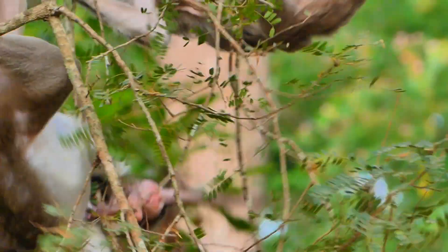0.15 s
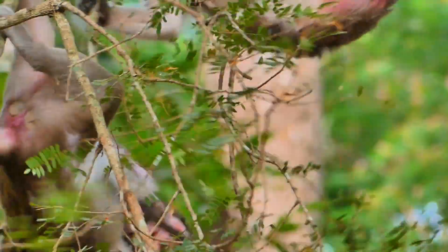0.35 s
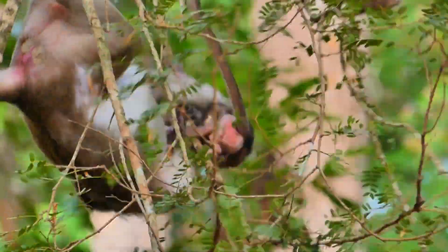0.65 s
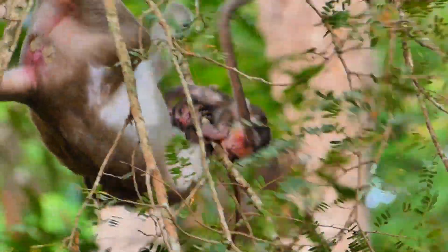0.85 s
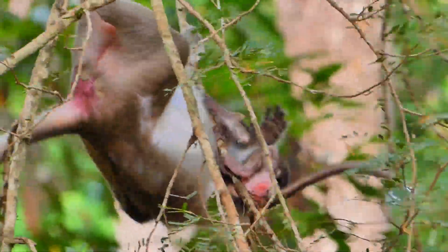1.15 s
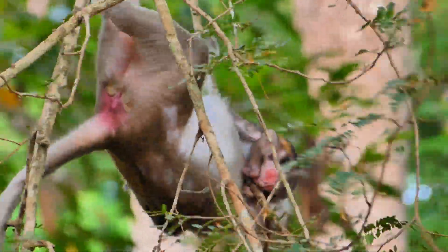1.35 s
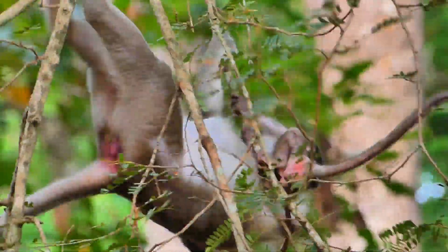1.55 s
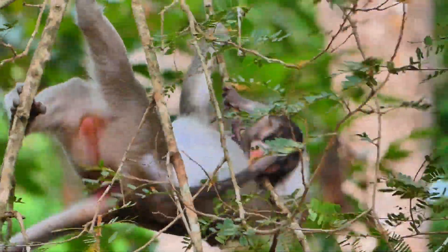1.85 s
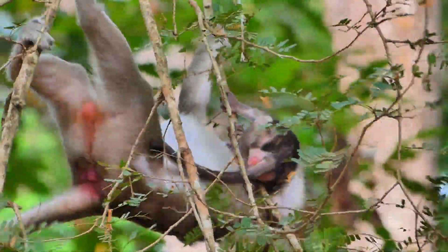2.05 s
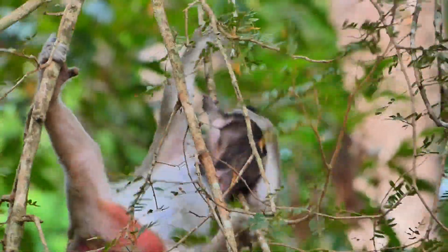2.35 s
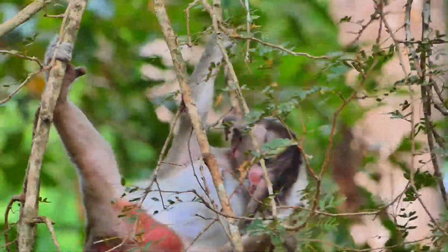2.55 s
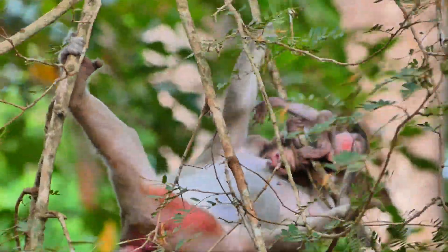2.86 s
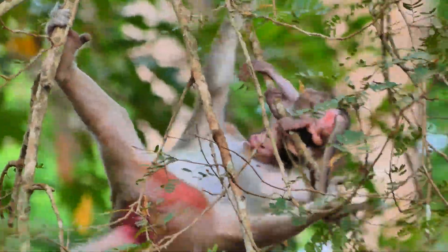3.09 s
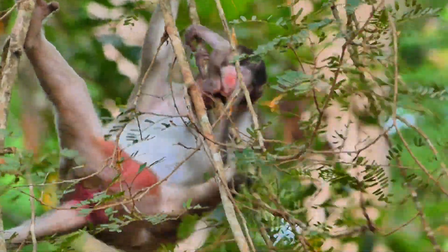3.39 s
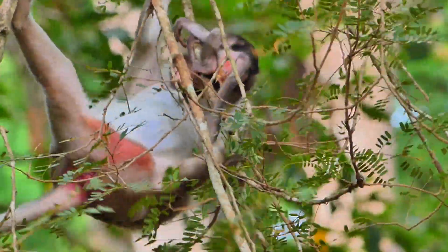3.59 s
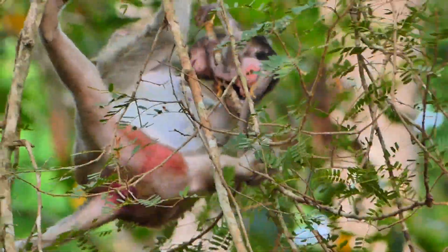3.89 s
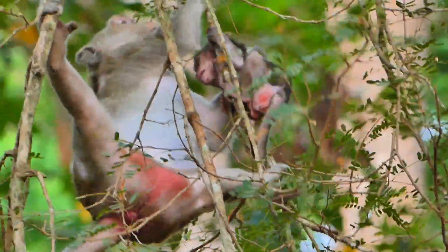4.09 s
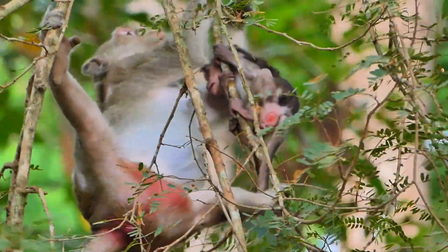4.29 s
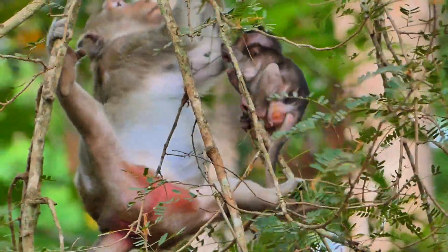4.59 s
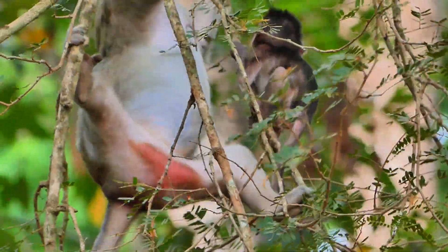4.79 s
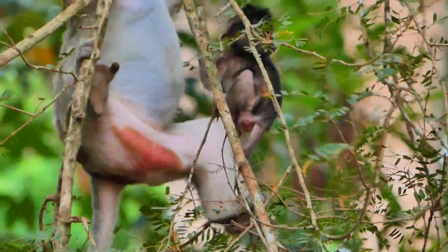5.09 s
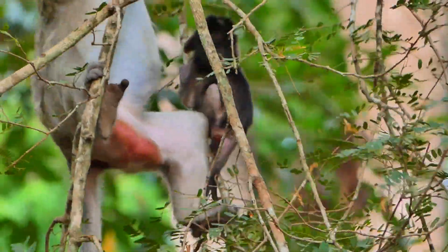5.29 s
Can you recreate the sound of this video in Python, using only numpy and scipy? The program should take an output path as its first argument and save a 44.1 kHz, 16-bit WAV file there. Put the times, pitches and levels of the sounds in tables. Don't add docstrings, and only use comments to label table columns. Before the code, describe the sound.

Close outdoor foliage sounds as monkeys climb a small tree. Leaves thrash at once while a young monkey gives a brief hissy rasp ending in a tiny squeak. Limbs scrape, twigs knock and snap in dense bursts for two seconds. A near-quiet lull follows over soft forest hush and faint birds, then one short high call and lighter rustling to the end. Nearly centred, narrow stereo, little echo.

```python
import sys
import numpy as np
from scipy import signal
from scipy.fft import rfft, irfft, next_fast_len
from scipy.io import wavfile
from scipy.ndimage import uniform_filter1d

SR = 44100
rng = np.random.default_rng(int(sys.argv[2]) if len(sys.argv) > 2 else 0)


def natural_amplitude(level_db):
    exponent = np.asarray(level_db, float) / 20
    return 10 ** exponent


def pcm_store(signal):
    levels = np.round(np.clip(np.atleast_2d(signal), -1, 1) * 32767)
    wavfile.write(sys.argv[1], SR, levels.astype(np.int16).T)


N = 239934
TIME = np.arange(N) / SR


def unit(x):
    return x / np.sqrt(np.mean(x ** 2) + 1e-20)


def along(points, hz):
    f, v = np.transpose(points)
    return np.interp(np.log(hz + 1), np.log(f + 1), v)


def curves(rows, outside=None):
    s, *cols = np.transpose(rows)
    return [np.interp(TIME, s, c, outside, outside) for c in cols]


def filtered(x, response):
    m = next_fast_len(N + 8192)
    return irfft(rfft(x, m) * response(np.fft.rfftfreq(m, 1 / SR)), m)[..., :N]


def coloured(x, spectrum):
    return filtered(x, lambda hz: natural_amplitude(along(spectrum, hz)))


def slow_noise(samples):
    return unit(uniform_filter1d(rng.standard_normal(N), size=samples))


def contacts(rate, spread_db, life):
    strength = natural_amplitude(spread_db * np.minimum(rng.exponential(1, N), 3.5))
    hits = (rng.random(N) < rate / SR) * strength
    return unit(signal.lfilter([1], [1, -np.exp(-1 / (life * SR))], hits))


def rush(spectrum, envelope=1, patchy_db=0):
    pair = envelope * rng.standard_normal((2, N))
    if patchy_db:
        z = signal.stft(pair, nperseg=512)[2]
        field = uniform_filter1d(rng.standard_normal(z.shape[1:]), size=4, axis=0)
        field = uniform_filter1d(field, size=6, axis=1)
        pair = signal.istft(z * natural_amplitude(patchy_db * unit(field)), nperseg=512)[1][:, :N]
    pair = coloured(pair, spectrum)
    return pair / np.std(pair[0])


def voice(pitch, multiples, levels_db, jitter):
    phase = 2 * np.pi * np.cumsum(pitch * (1 + jitter * slow_noise(200))) / SR
    return sum(np.sqrt(2) * natural_amplitude(db) * np.sin(k * phase + k * k / 2)
               for k, db in zip(multiples, levels_db))


def moves(rows, sway_db):
    edge_db, edge_shape, release = 9.5, 0.91, 1.2
    t = TIME[::32]
    s, db, half, second_db = np.transpose(rows)[:, :, None]
    u = np.abs(t - s) / (half * np.where(t > s, release, 1))
    swell = natural_amplitude(2 * (db - edge_db * np.minimum(u, 10) ** edge_shape))
    both = [swell.sum(axis=0), (swell * natural_amplitude(2 * second_db)).sum(axis=0)]
    return [10 * np.log10(natural_amplitude(2 * under) + np.interp(TIME, t, over))
            for under, over in zip(sway_db, both)]


# time in seconds, strength in dB.
TREE_SWAY = [(0, -41.5), (.4, -48.5), (1.1, -49), (1.6, -49), (2.0, -49.5), (2.3, -51), (2.9, -52.5),
             (3.1, -49.5), (3.4, -49.5), (3.65, -48.5), (3.95, -48.5), (4.2, -52.5), (4.5, -49), (4.8, -52),
             (5.1, -47.5), (5.44, -47)]


def sway(over_db=0, swing=1):
    mean_db = -50
    return mean_db + over_db + swing * (curves(TREE_SWAY)[0] - mean_db)


# time in seconds, strength in dB, half length in seconds,
# stem creak over bark in dB.
LIMB_SCRAPES = [(.06, -48.5, 0.089, 2.5), (.22, -47.5, 0.053, 5), (.505, -45, 0.012, 3),
                (.3, -55, 0.042, -10), (.56, -50.5, 0.16, 1.5), (.672, -42, 0.029, -1),
                (.686, -52, .016, 6), (.703, -42, 0.014, 7.5), (.728, -40.5, 0.039, 0),
                (.765, -44.5, 0.05, -5), (.81, -46.5, .04, -10), (.85, -47, 0.013, 2),
                (.868, -43, 0.036, -13), (.96, -41, 0.0075, -19), (1.06, -43, 0.021, -2),
                (1.13, -45.5, 0.041, -12), (1.315, -50, .022, -15), (1.345, -39, 0.024, -24),
                (1.373, -40.5, 0.027, -10), (1.4, -46, 0.022, -15), (1.49, -51.5, 0.06, -16),
                (1.715, -48, 0.069, -8), (1.772, -43.5, 0.037, -5), (1.82, -59, 0.056, -9),
                (2.15, -63.5, .08, 11), (2.6, -67.5, .2, 10), (1.872, -43.5, 0.025, -2),
                (1.894, -36.5, 0.015, -9), (1.912, -35, 0.0046, -5), (2.35, -58, 0.045, 7),
                (3.3, -66, 0.13, 12), (3.07, -62, 0.05, 9), (3.515, -48, 0.023, 2), (3.62, -56.5, 0.066, 9),
                (3.69, -54.5, 0.028, -7), (3.78, -56.5, 0.023, 8), (3.91, -55, 0.041, 5.5),
                (4.35, -66, .02, 12), (4.44, -55.5, 0.47, -10), (4.5, -51.5, 0.055, -6),
                (4.87, -59, 0.16, 2), (4.96, -48.5, 0.055, -9), (5.02, -54, .05, -3),
                (5.15, -49.5, 0.06, -4), (5.35, -52, 0.065, 3.5), (5.425, -50.5, 0.061, -8)]
# time in seconds, ring over bark in dB.
LIMB_GRIP = [(0, -38), (.6, -28), (.72, -8), (1.05, -2.5), (1.2, -3), (1.35, -4.5), (1.6, -4.5), (1.8, -15),
             (1.92, -15), (2.0, -31), (4.3, -23), (4.5, -7), (4.7, -13), (5.44, -7.5)]
# frequency in Hz, density in dB per Hz.
BARK_SPECTRUM = [(80, -45), (150, -18.5), (220, -22), (400, -2.5), (530, 0.5), (700, 1), (980, -3),
                 (1150, -5), (1500, -3.5), (1800, -10), (2400, -23), (4200, -120)]
LIMB_SPECTRUM = [(900, -70), (1200, -10), (1300, -2), (1400, 0), (1550, -4), (1750, -14), (2300, -70)]
STEM_SPECTRUM = [(1200, -35), (1700, -1.5), (2000, -2.5), (2450, 0), (2800, -8), (4000, -52)]


def scraping_bark(crackle, bumps):
    bark_db, stem_db = moves(LIMB_SCRAPES, [sway(-6.5, 0.99), sway(-8.5, 0.4)])
    limb_db = bark_db + curves(LIMB_GRIP)[0]
    bark = natural_amplitude(bark_db - 1.5) * rush(BARK_SPECTRUM, 1 + .5 * crackle + .3 * bumps, patchy_db=1.8)
    limb = natural_amplitude(limb_db) * rush(LIMB_SPECTRUM, 1 + 0.13 * crackle + 0.93 * bumps)
    stem = natural_amplitude(stem_db - 5.0) * rush(STEM_SPECTRUM, 1 + 0.067 * crackle + 0.21 * bumps, patchy_db=2.5)
    return bark + limb + stem


# time in seconds, strength in dB, half length in seconds,
# fizz over thrash in dB.
LEAF_SHAKES = [(0, -37.5, 0.044, 3), (.13, -40, 0.057, -6), (.2, -32, 0.019, -18), (.46, -43, 0.087, -6),
               (.51, -41.5, 0.013, -3), (.69, -38.5, 0.034, -8.5), (.75, -38.5, 0.082, -5),
               (.87, -44, 0.036, -11), (1.07, -47, 0.11, -4), (1.306, -44, 0.013, -13),
               (1.332, -34, 0.021, -7), (1.369, -31.5, 0.036, -8.5), (1.398, -39, .016, -9),
               (1.48, -44, 0.046, -11), (1.715, -43.5, 0.046, -9), (1.775, -42.5, .05, -4.5),
               (1.852, -47, .016, -8), (1.88, -37, 0.023, -6.5), (1.906, -40, 0.025, -5),
               (2.343, -58, 0.0092, 2), (3.08, -64, 0.066, 6.5), (3.47, -46, 0.034, -12),
               (3.52, -51, 0.013, 6), (3.515, -44, .03, -7), (3.56, -48, .05, -5), (3.62, -43.5, 0.049, -8),
               (3.68, -47, 0.04, -20), (3.79, -47.5, 0.073, -5.5), (3.91, -47, 0.054, -6.5),
               (4.35, -62, .015, 2), (4.44, -48, 0.046, -8), (4.57, -49.5, 0.031, -9),
               (4.85, -51, 0.022, -13), (5.01, -54, .04, -4), (5.15, -43, 0.07, -7.5),
               (5.31, -44, .02, -14), (5.34, -40, 0.024, -7), (5.375, -42, 0.038, -7),
               (5.43, -46, 0.046, -9)]
# frequency in Hz, density in dB per Hz.
LEAF_SPECTRUM = [(1590, -33.5), (2700, 0), (2870, -0.5), (3270, 1.5), (3600, -1.5), (4100, 1), (4450, 0.5),
                 (4900, 1.5), (5280, 1.5), (6060, -2.5), (7170, -3.5), (7800, -15), (10100, -59),
                 (17200, -120)]
FIZZ_SPECTRUM = [(3000, -100), (6800, -10), (7500, -6.5), (8500, -7.5), (9300, -4.5), (10000, -3),
                 (10800, -8.5), (11700, -11), (14700, -20), (15700, -37)]


def shaking_leaves(crackle, bumps):
    leaf_db, fizz_db = moves(LEAF_SHAKES, [sway(), sway(-11.5, 3.34)])
    leaf = natural_amplitude(leaf_db - 4.0) * rush(LEAF_SPECTRUM, 1 + 0.19 * crackle + 0.28 * bumps, patchy_db=1.5)
    fizz = natural_amplitude(fizz_db - 2.8) * rush(FIZZ_SPECTRUM, 1 + .45 * crackle + .3 * bumps, patchy_db=1.2)
    return leaf + fizz


def foliage():
    crackle = contacts(rate=500, spread_db=5, life=.0018)
    bumps = contacts(rate=130, spread_db=3.5, life=0.052)
    return scraping_bark(crackle, bumps) + shaking_leaves(crackle, bumps)


def twig_radiation(x):
    return filtered(x, lambda hz: (1j * hz / (250 + 1j * hz)) ** 2)


# start in seconds, peak in dB, pitch in Hz.
TWIG_KNOCKS = [(0.486, -38, 2470), (0.504, -40, 568), (0.554, -31, 743), (0.628, -38, 554),
               (0.664, -37, 673), (0.672, -34, 650), (0.6835, -34, 1350), (0.694, -34, 1350),
               (0.761, -35, 1350), (0.837, -36, 600), (0.679, -31, 2100), (0.696, -33, 721),
               (0.716, -33, 620), (0.729, -31, 1350), (0.748, -33, 1300), (0.846, -29, 900),
               (0.858, -33, 600), (0.957, -35.5, 880), (0.977, -39, 1350), (1.266, -40, 1420),
               (1.313, -35, 1350), (1.606, -41, 659), (1.03, -33, 528), (1.108, -30, 498),
               (1.113, -33, 620), (1.333, -31, 1350), (1.483, -32.5, 1450), (1.509, -29, 800),
               (1.623, -39, 484), (1.774, -38, 1300), (1.868, -32, 762), (1.886, -32, 1500),
               (1.904, -33, 1600), (2.063, -38, 711), (2.105, -44, 762), (2.346, -37, 896),
               (2.464, -37, 520), (2.274, -44, 923), (2.287, -43, 447), (3.858, -42, 853),
               (4.105, -42, 738), (4.179, -43, 786), (4.31, -44, 2350), (4.323, -43, 1300),
               (4.469, -38, 783), (4.477, -40, 778), (4.729, -43, 759), (4.889, -42, 654),
               (4.988, -39, 964), (5.091, -42, 918), (5.259, -40, 1400), (5.393, -37, 700),
               (5.417, -35, 600), (5.428, -34, 4300), (5.4102, -29, 692)]


def knocks():
    out, t = np.zeros(N + SR), np.arange(SR // 20) / SR
    u = t - .0028
    swell = np.exp(-(u / np.where(u < 0, .0007, .0022)) ** 2)
    for s, db, hz in TWIG_KNOCKS:
        ring = np.sin(2 * np.pi * hz * u) + .3 * np.sin(2 * np.pi * 1.8 * hz * u)
        out[round(s * SR):][:len(t)] += natural_amplitude(db - 1.5) * swell * ring
    return twig_radiation(out[:N])


# start in seconds, peak in dB, pitch in Hz, top sparkle in dB.
TWIG_SNAPS = [(0.2274, -38, 4530, -20), (0.5055, -31, 3460, -11), (1.057, -30, 4670, -6),
              (1.086, -31, 5230, -14), (1.1667, -29, 2940, -14), (1.324, -27, 4060, -18),
              (1.365, -22, 5500, -19), (1.378, -25, 3370, -20), (1.536, -27.5, 3060, -20),
              (1.566, -27.5, 3370, -25), (1.6223, -27, 3030, -24), (1.711, -32, 3440, -18),
              (1.773, -32, 5700, -15), (1.849, -29, 5100, -20), (1.8786, -26, 5950, -19),
              (1.902, -25, 4060, -24), (2.047, -34, 4540, -14), (2.063, -37, 4470, -4),
              (2.106, -37, 3100, -28), (2.344, -30, 5970, -9), (2.432, -36, 5920, -3),
              (3.074, -42, 3010, 3), (3.115, -39, 6000, 1), (3.506, -32, 5200, -6),
              (3.669, -28.5, 3030, -16), (4.314, -32, 3570, -22), (4.043, -32, 4230, -6.5),
              (4.353, -29.5, 6600, -9), (4.417, -31, 4220, -2.5), (4.478, -28.5, 4040, -11),
              (4.559, -31, 3350, -11), (4.579, -33, 3340, -20), (4.729, -33, 3350, -30),
              (4.839, -32.5, 2750, -7), (5.3373, -26, 4600, -20)]
# frequency in Hz, density in dB per Hz.
CRACK_SPECTRUM = [(800, -40), (2200, -3), (4000, 0), (7000, -2), (9000, -25)]
SPARKLE_SPECTRUM = [(5000, -50), (7500, -6), (10000, 1), (11500, -6), (15500, -15)]


def snaps():
    rings, cracks, bright = np.zeros((3, N + SR))
    t = np.arange(SR // 20) / SR
    for s, db, hz, top_db in TWIG_SNAPS:
        spot = slice(round(s * SR), round(s * SR) + len(t))
        grit = rng.standard_normal((2, len(t)))
        fade = natural_amplitude(db + .3 - 60 * t / .013) * (1 - np.exp(-(t / .0012) ** 2))
        rings[spot] += .6 * fade * np.sin(2 * np.pi * hz * t)
        cracks[spot] += 1.2 * fade * grit[0]
        bright[spot] += natural_amplitude(top_db + 7.0) * fade * grit[1]
    crack = coloured(cracks[:N], CRACK_SPECTRUM)
    sparkle = coloured(bright[:N], SPARKLE_SPECTRUM)
    return twig_radiation(rings[:N]) + crack + sparkle


# centre in
# seconds, peak in dB, pitch in Hz.
FLAKE_TICKS = [(0.1921, -18, 5000), (0.665, -33, 2500), (0.694, -35, 2600), (0.7023, -33, 1900),
               (.7165, -33, 2400), (.9595, -43, 1300), (1.033, -36, 1200), (1.169, -40, 2500),
               (1.367, -32, 5000), (1.511, -43, 1400), (1.6243, -35, 3500), (2.042, -38, 3800),
               (2.066, -41, 1510), (2.1075, -40, 4000), (2.4335, -40, 9000), (3.769, -35, 2200),
               (4.3255, -41, 2000), (4.479, -37, 2500), (4.7315, -38, 2500), (5.378, -37, 4200),
               (5.4108, -41, 1200)]


def flakes():
    out, t = np.zeros(N + SR), np.arange(-100, 100) / SR
    for s, db, hz in FLAKE_TICKS:
        u = 2 * np.pi * hz * t
        out[round(s * SR) - 100:][:len(t)] -= natural_amplitude(db + 3) * np.sin(u) * np.exp(-u * u / 12)
    return out[:N]


# time in seconds, level in dB.
BREATH_EFFORT = [(0, -34), (.02, -32), (.044, -32.5), (.07, -36.5), (.092, -35), (.105, -39), (.12, -36.5),
                 (.148, -40.5), (.17, -33.5), (.186, -34)]
# time in seconds, pitch in Hz, level in dB.
TEETH_WHISTLE = [
    (.025, 9000, -60),
    (.04, 10200, -46),
    (.06, 11200, -33),
    (.085, 10700, -41),
    (.11, 10850, -46),
    (.15, 10600, -37),
    (.175, 10500, -60),
]
# time in seconds, pitch in Hz, level in dB.
HOARSE_TONE = [
    (0, 3715, -34),
    (.018, 3750, -26),
    (.03, 3710, -43),
    (.045, 3820, -60),
]
# frequency in Hz, density in dB per Hz.
THROAT_SPECTRUM = [(2600, -60), (3300, -15), (3750, -2.5), (4100, -7), (4450, -0.5), (5000, -7.5),
                   (6500, -62)]
MOUTH_SPECTRUM = [(3500, -57), (5000, 1), (5600, 5), (7000, 4.5), (8400, -2.5), (11000, -62)]
TEETH_SPECTRUM = [(7000, -58), (8600, -3.5), (9700, -3), (10300, -4.5), (11000, -5), (11800, -5),
                  (13000, -11), (15700, -22)]


def rasp():
    effort_db = curves(BREATH_EFFORT)[0] - 150 * np.maximum(TIME - .205, 0)
    throb = .8 + .6 * np.exp(-TIME / .045) * np.cos(2 * np.pi * 75 * (TIME - .005))
    late = np.clip(TIME / 0.21, 0, 1)
    throat = natural_amplitude(effort_db - 2.5 * (0.5 - np.exp(-TIME / 0.073)))
    mouth = natural_amplitude(effort_db - 5 + 5.5 * late ** 2)
    teeth = natural_amplitude(effort_db + 0.5 - 8.7 * late ** 3 - 15 * np.exp(-(TIME / 0.035) ** 4))
    grain = 1 + .35 * contacts(rate=900, spread_db=3, life=.001)
    hiss = throat * throb * rush(THROAT_SPECTRUM, grain)
    hiss = hiss + mouth * rush(MOUTH_SPECTRUM, grain) + teeth * rush(TEETH_SPECTRUM, grain)
    whistle_hz, whistle_db = curves(TEETH_WHISTLE, outside=-150)
    hoarse_hz, hoarse_db = curves(HOARSE_TONE, outside=-150)
    whistle = voice(whistle_hz, [1], [whistle_db], jitter=0.02)
    hoarse = voice(hoarse_hz, [1, 1.17], [hoarse_db, hoarse_db - 12], jitter=0.023)
    return hiss + (whistle + throb * hoarse) * [[1], [.5]]


# time in seconds, pitch in Hz, level in dB.
SQUEAK_GLIDE = [
    (.188, 1160, -52),
    (.195, 1145, -35),
    (.201, 1136, -25),
    (.2065, 1134, -30),
    (.214, 1136, -37),
    (.224, 1136, -55),
]
# multiple of the pitch, level in dB.
SQUEAK_OVERTONES = [(2, -21), (4, 0), (5, -13), (6, -5)]


def squeak():
    hz, db = curves(SQUEAK_GLIDE, outside=-150)
    multiples, over_db = zip(*SQUEAK_OVERTONES)
    return voice(np.abs(hz), multiples, [db + over for over in over_db], jitter=.004)


# time in seconds, pitch in Hz, level in dB.
CALL_GLIDE = [
    (3.4, 825, -66),
    (3.412, 860, -51.5),
    (3.436, 925, -52),
    (3.45, 1080, -48),
    (3.466, 1116, -44.5),
    (3.58, 1121, -43.5),
    (3.606, 1108, -45),
    (3.627, 975, -51),
    (3.64, 940, -72),
]
# frequency in Hz, gain in dB.
CALL_RESONANCES = [(1750, -4), (2250, -14.5), (2600, -10), (3000, -13), (3200, -10), (3350, -.5),
                   (3700, -4), (4500, 0), (5600, -8.5), (6850, -15), (7080, 8), (7350, -17), (9000, -25)]


def arched_call():
    full_hz, arch_hz, dull_db = 1100, 15, 30
    hz, db = curves(CALL_GLIDE, outside=-150)
    hz = np.abs(hz) + arch_hz * np.exp(-((TIME - 3.535) / .035) ** 2)
    slack = np.clip(np.log2(full_hz / hz), 0, 1)
    flutter_db = 2 * slow_noise(900)
    tones, tones_db = range(2, 9), []
    for k in tones:
        colour_db = along(CALL_RESONANCES, k * hz) - dull_db * slack * max(k - 4, 0)
        tones_db.append(db + np.roll(flutter_db, 3000 * k) + colour_db)
    return voice(hz, tones, tones_db, jitter=.002)


# start in seconds, length in seconds, first and last pitch in Hz, level in dB.
BIRD_WHISTLES = [(.87, .035, 5400, 5650, -54), (2.622, .082, 5200, 7000, -54.5),
                 (1.95, .14, 3050, 3050, -62), (3.1, .2, 6060, 6040, -64), (2.9, .15, 9000, 9750, -68),
                 (3.14, .2, 3050, 3030, -61), (4.07, .06, 2300, 2280, -62), (4.23, .06, 2300, 2290, -62),
                 (4.28, .093, 2300, 2280, -56), (4.78, .04, 2450, 2450, -61), (4.23, .08, 1525, 1525, -65),
                 (4.225, .045, 3050, 3050, -58), (4.628, .03, 5300, 5600, -54)]


def birds():
    out = np.zeros(N)
    for s, length, first_hz, last_hz, db in BIRD_WHISTLES:
        u = np.clip((TIME - s) / length, 0, 1)
        phase = 2 * np.pi * np.cumsum(first_hz + (last_hz - first_hz) * u ** 1.7) / SR
        out += natural_amplitude(db + 3) * np.sin(np.pi * u) ** .5 * (u < 1) * np.sin(phase)
    return out * natural_amplitude(1.5 * slow_noise(500))


# frequency in Hz, time to fall 60 dB in seconds.
GROVE_DECAY = [(300, .25), (4000, .32), (7000, .36), (12000, .15)]


def grove(x):
    hz, t, z = signal.stft(rng.standard_normal((2, SR // 2)), SR, nperseg=256)
    fade = natural_amplitude(-60 * t / along(GROVE_DECAY, hz)[:, None])
    tail = signal.istft(z * fade, SR, nperseg=256)[1]
    late = np.pad(x, (300, 0))[None]
    return signal.fftconvolve(late, tail / np.linalg.norm(tail[0]), axes=1)[:, :N]


# frequency in Hz, density in dB per Hz.
HUSH_SPECTRUM = [(29, -54), (50, -19), (150, -12), (269, -7.5), (415, 1.5), (581, -8.5), (834, 0),
                 (918, -2.5), (1060, -1.5), (1840, -21), (2240, -17), (2700, -14), (3050, -4), (3400, -7),
                 (4080, -32), (5440, -2), (9460, -17), (15700, -26)]


def hush():
    return natural_amplitude(-52.5 - 0.66) * rush(HUSH_SPECTRUM, patchy_db=2.0)


# frequency in Hz, side minus mid in dB.
STEREO_WIDTH = [(60, -11), (200, -11), (380, -16.5), (700, -19), (2380, -14), (4400, -14.5), (7000, -15),
                (9500, -11), (12000, -8.5), (15000, -5)]


def scene():
    call, cry = arched_call(), squeak()
    near = knocks() + snaps() + flakes() + birds()
    wet = grove(natural_amplitude(-12) * near + natural_amplitude(-20) * call + natural_amplitude(-15) * cry)
    mid, side = foliage() + rasp() + hush() + wet
    mid = mid + near + call + cry
    side = coloured(side, STEREO_WIDTH)
    side = side + filtered(mid, lambda hz: 0.044 * (hz > 7500))
    return np.array([mid + side, mid - side])


def roll_off(x):
    return signal.sosfilt(signal.butter(12, 15830, fs=SR, output="sos"), x)


def record(dry):
    def response(hz):
        notch = 1 - 0.49 * np.exp(-((hz - 7600) / 90) ** 2)
        notch -= 0.56 * np.exp(-((hz - 3700) / 90) ** 2)
        notch -= 0.24 * np.exp(-((hz - 2700) / 170) ** 2)
        bass_cut = (1j * hz / (130 + 1j * hz)) ** 2
        return notch * bass_cut / (1 + (hz / 15280) ** 50)

    return roll_off(filtered(dry, response))


dry = scene()
out = record(dry)
pcm_store(out)
```